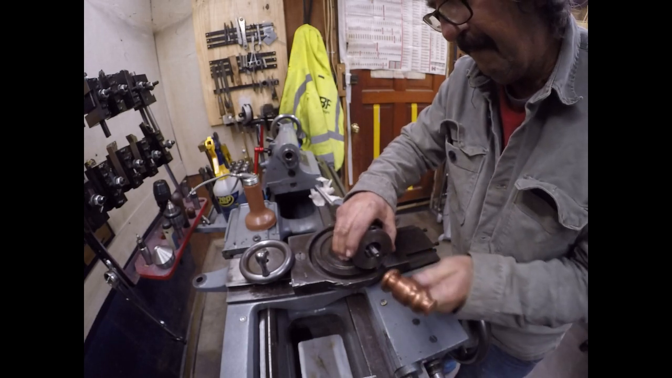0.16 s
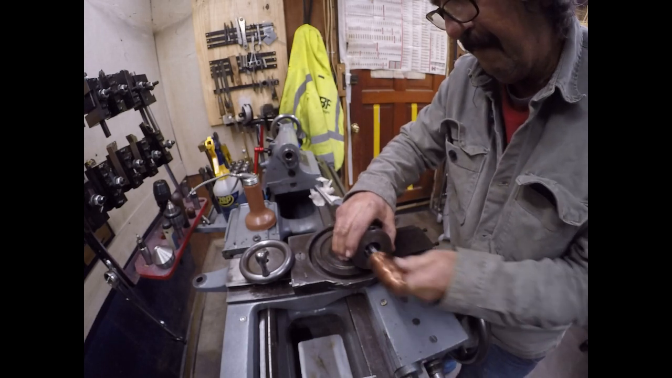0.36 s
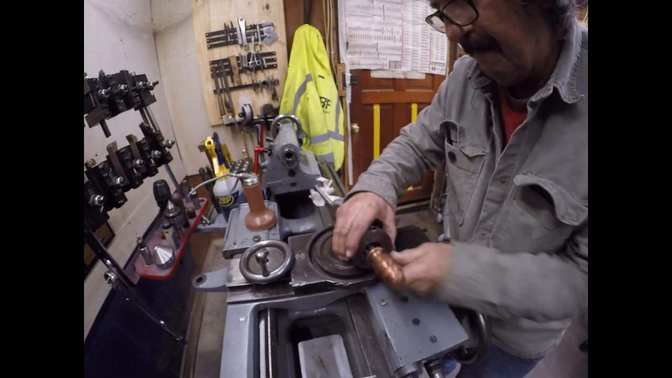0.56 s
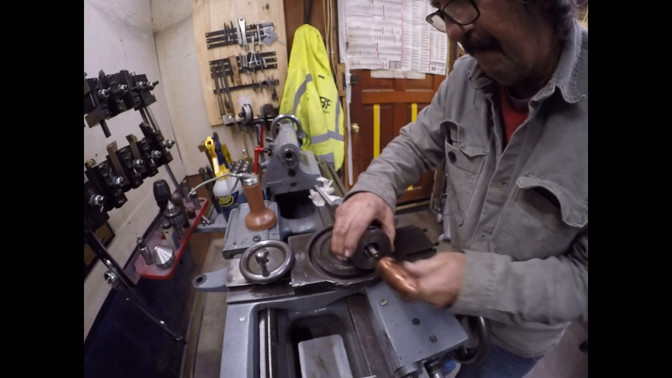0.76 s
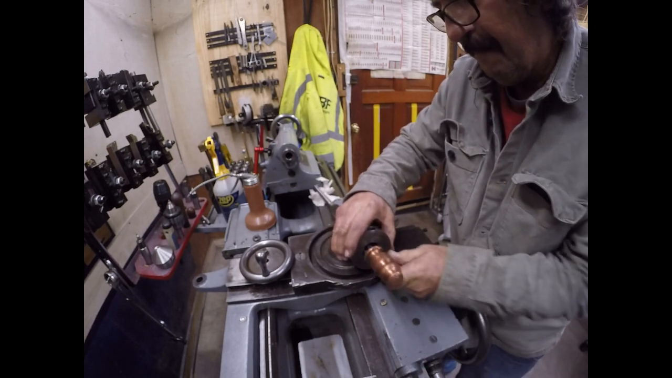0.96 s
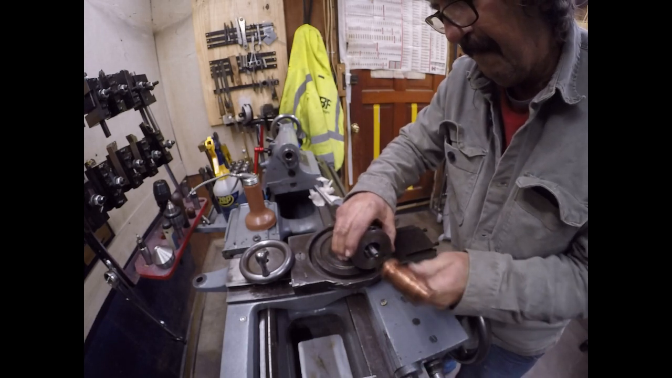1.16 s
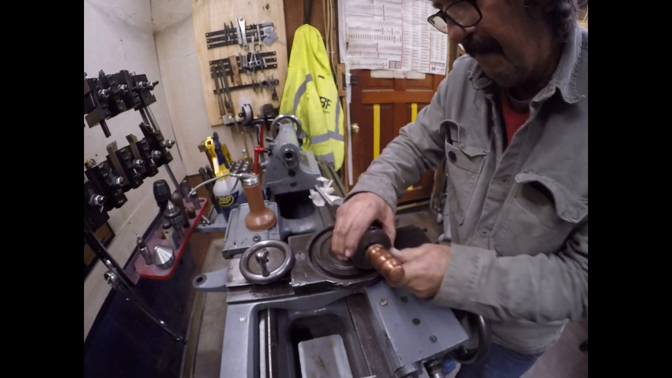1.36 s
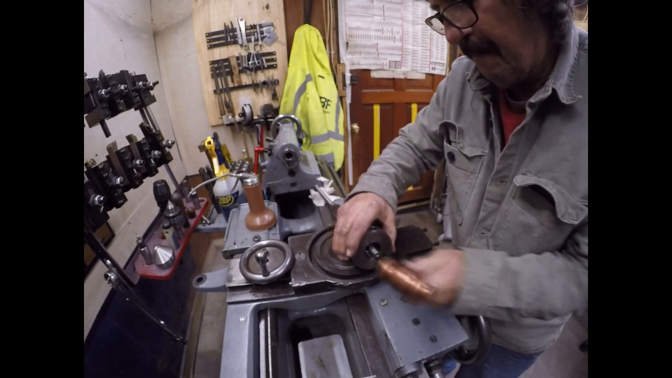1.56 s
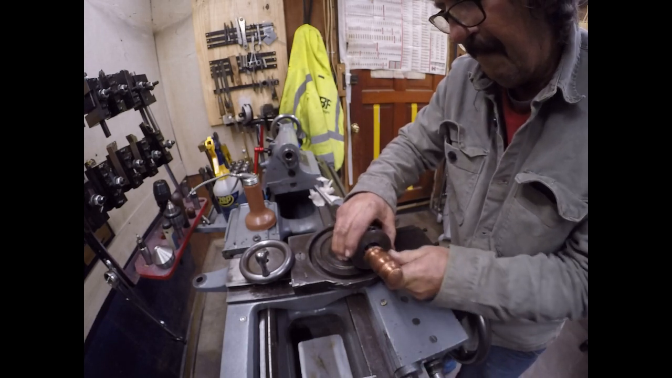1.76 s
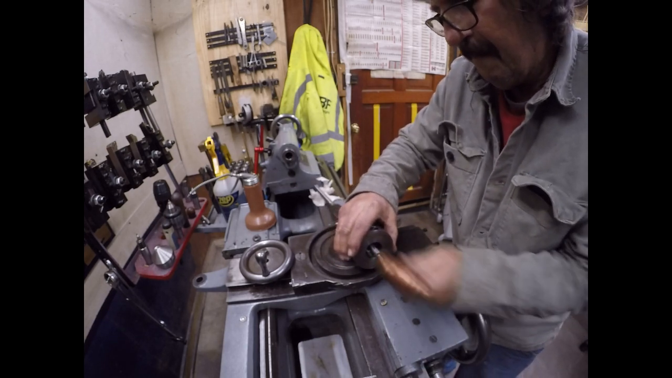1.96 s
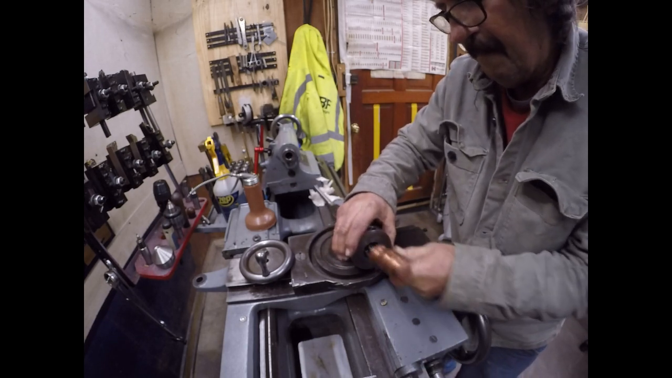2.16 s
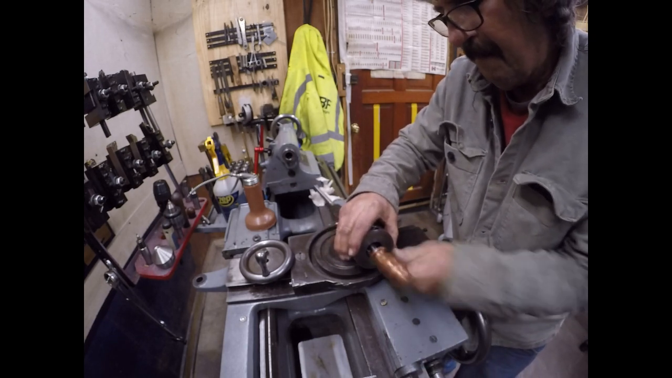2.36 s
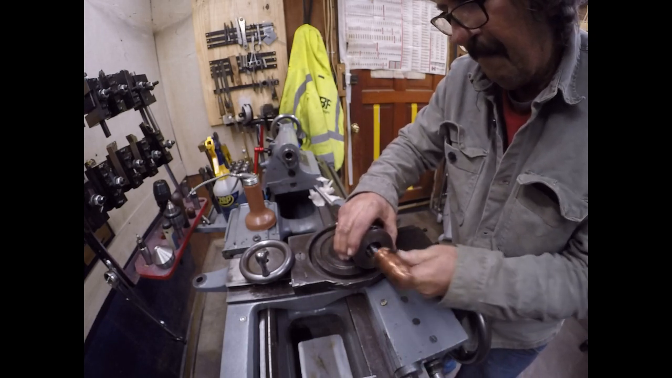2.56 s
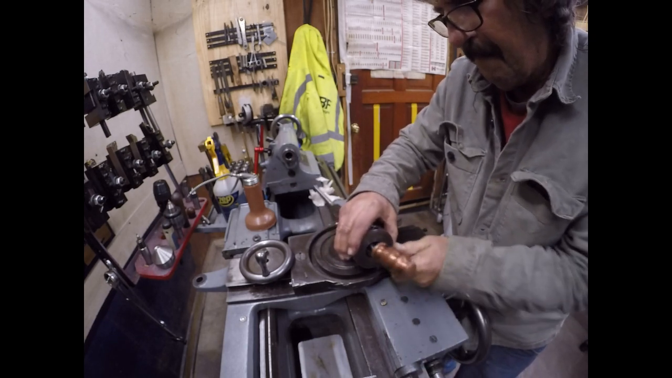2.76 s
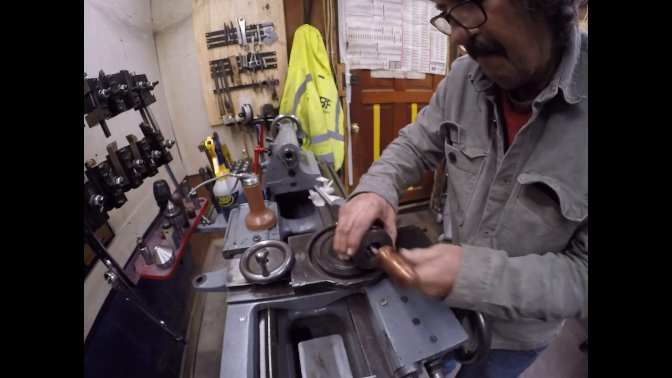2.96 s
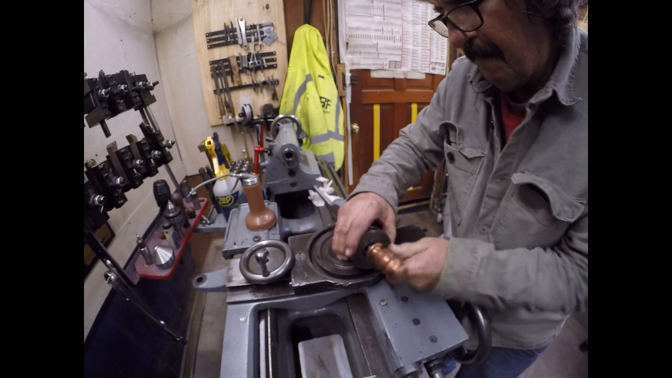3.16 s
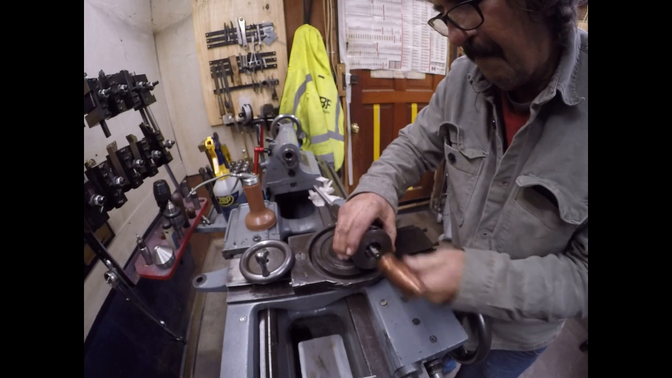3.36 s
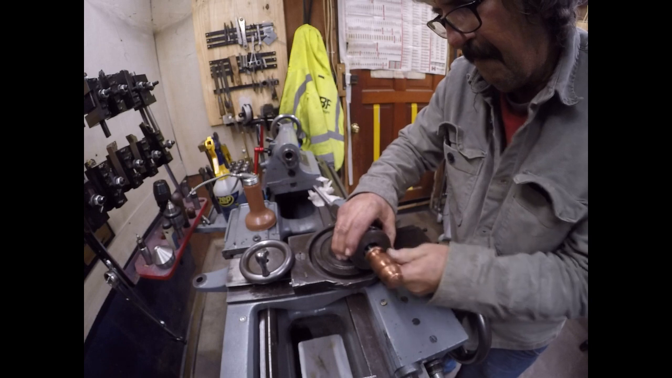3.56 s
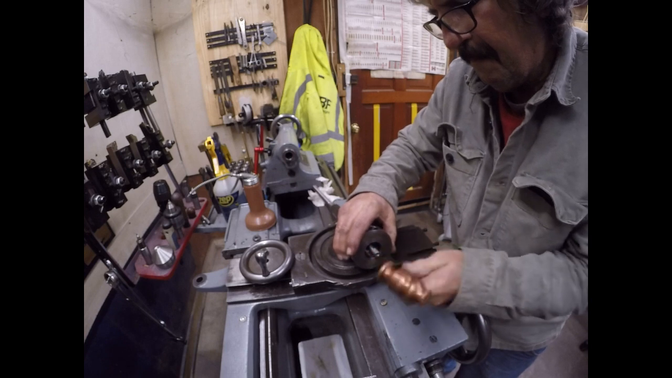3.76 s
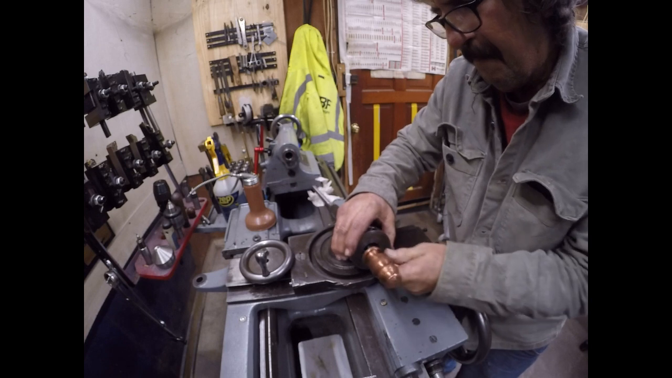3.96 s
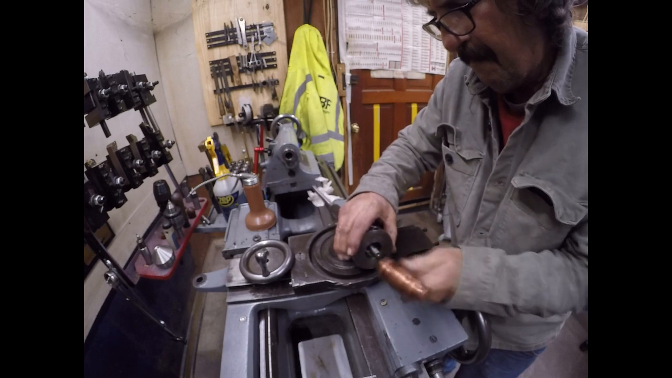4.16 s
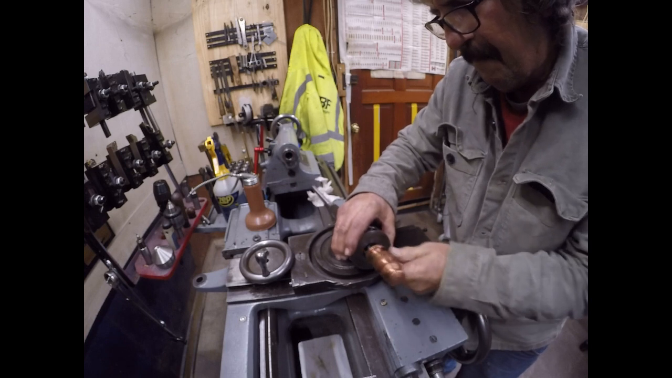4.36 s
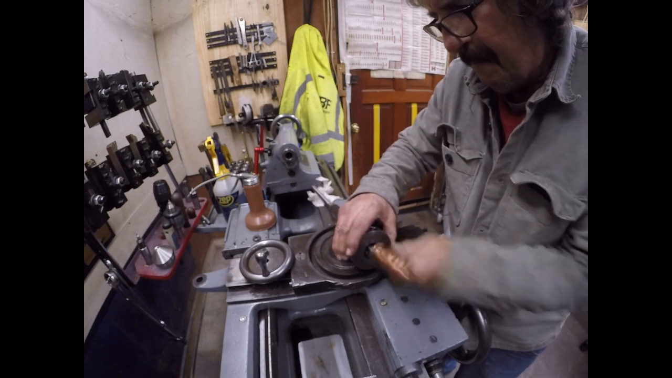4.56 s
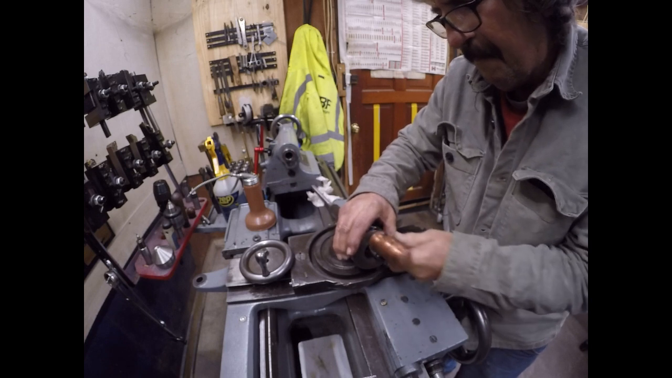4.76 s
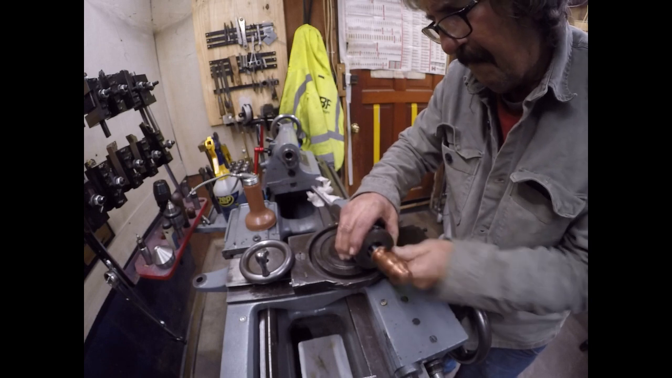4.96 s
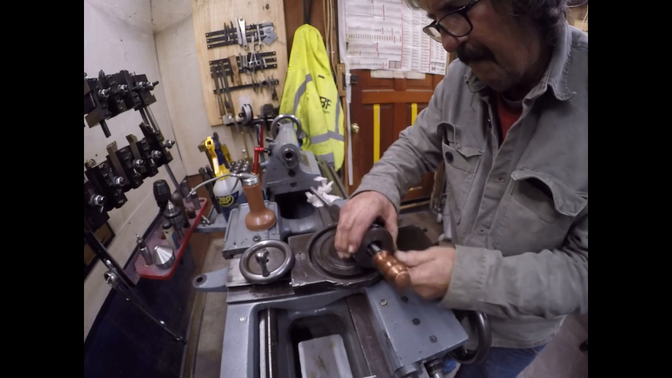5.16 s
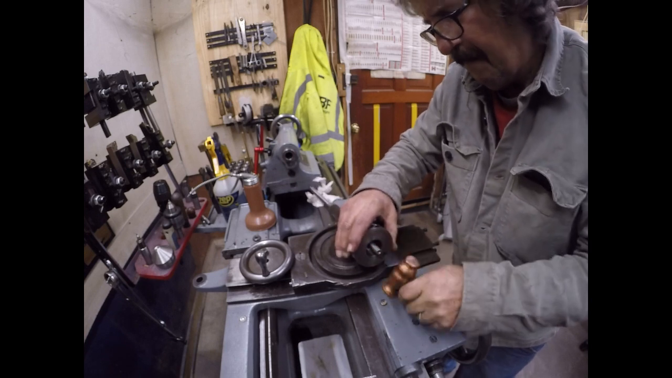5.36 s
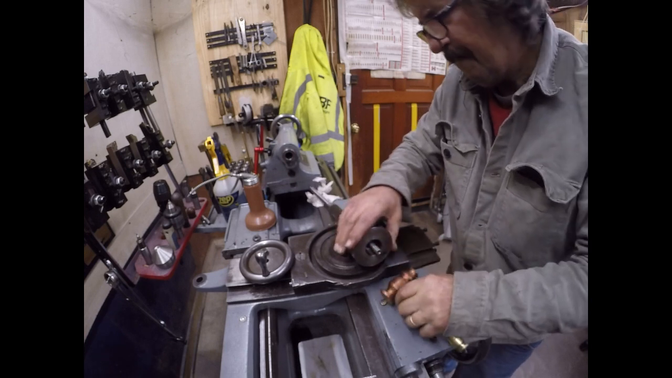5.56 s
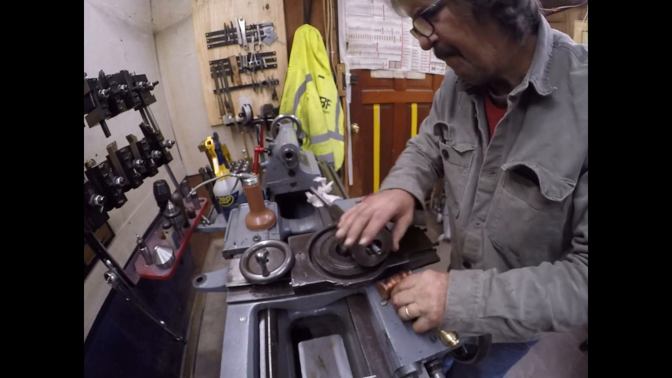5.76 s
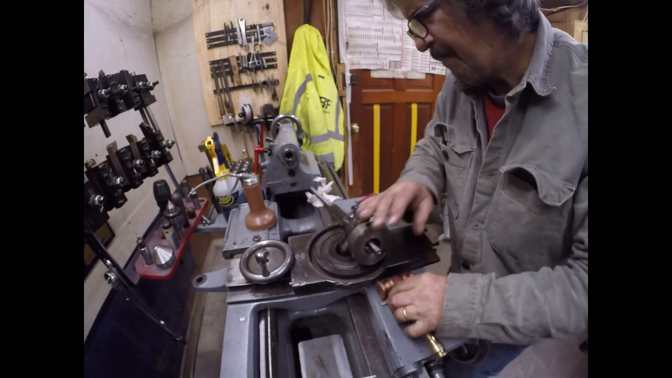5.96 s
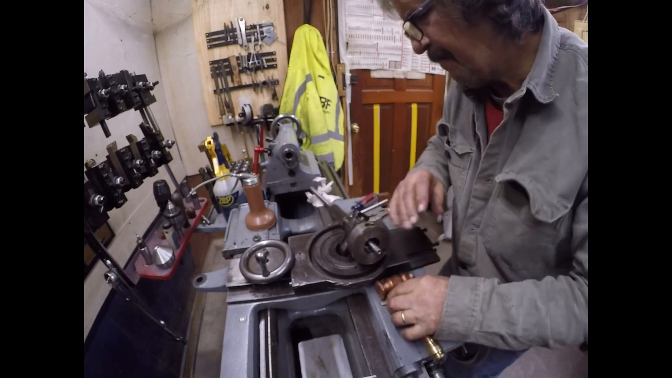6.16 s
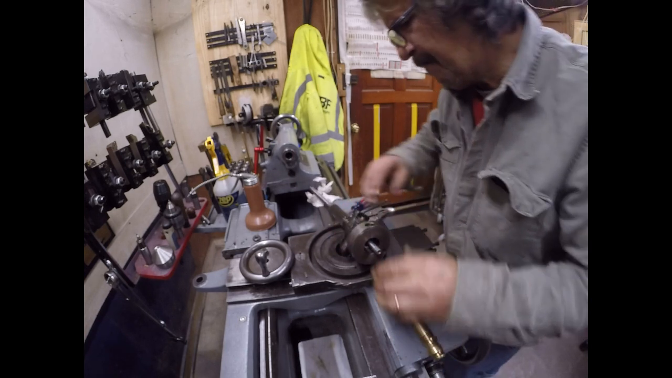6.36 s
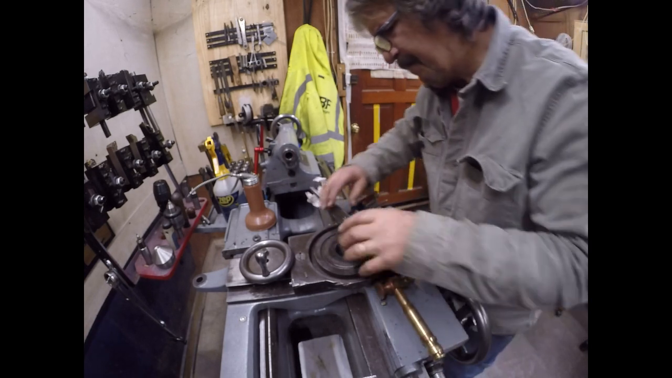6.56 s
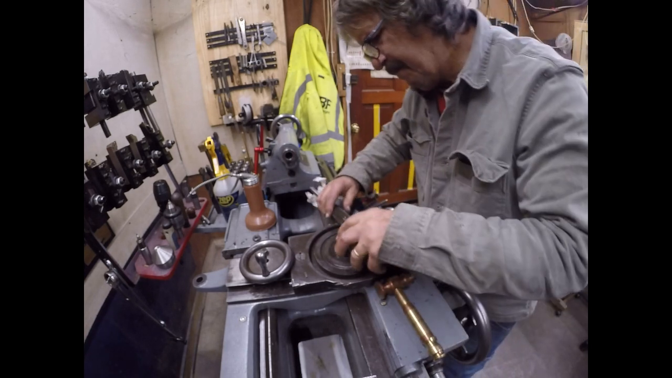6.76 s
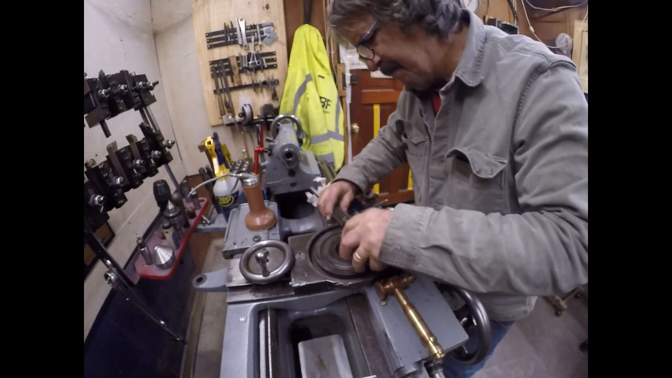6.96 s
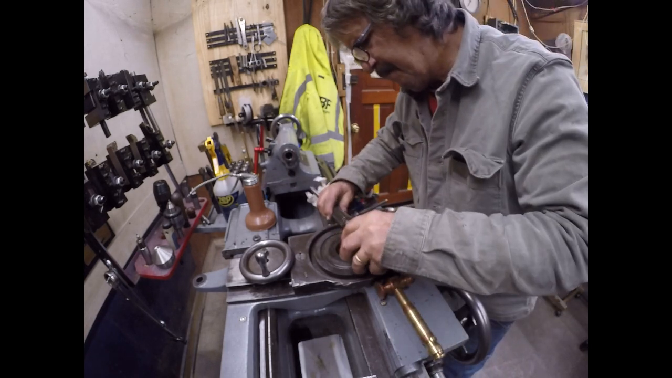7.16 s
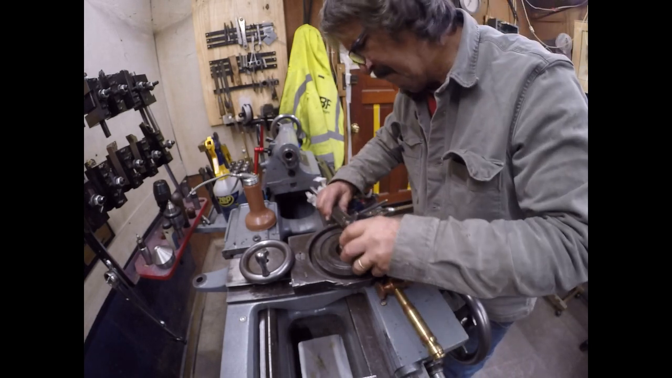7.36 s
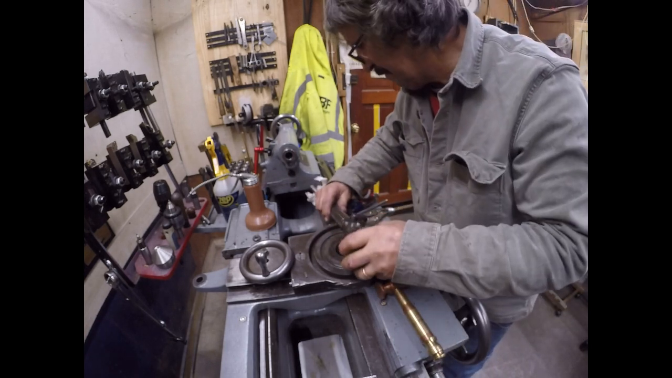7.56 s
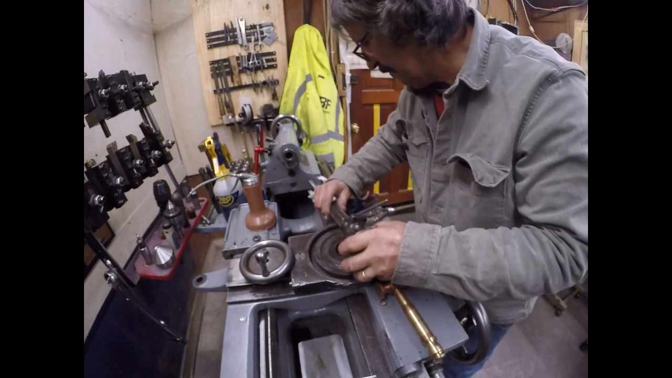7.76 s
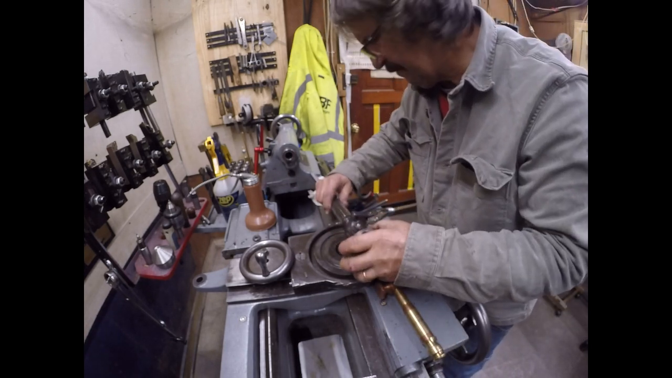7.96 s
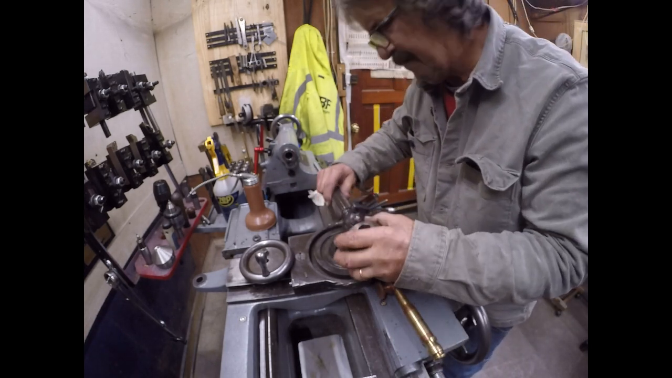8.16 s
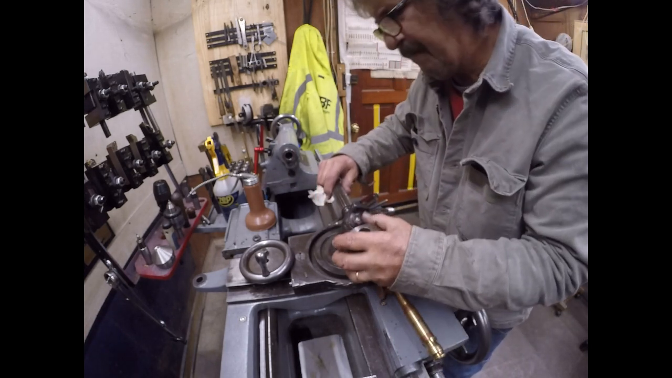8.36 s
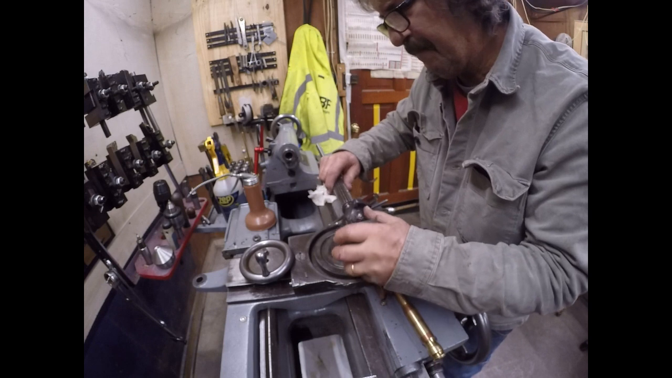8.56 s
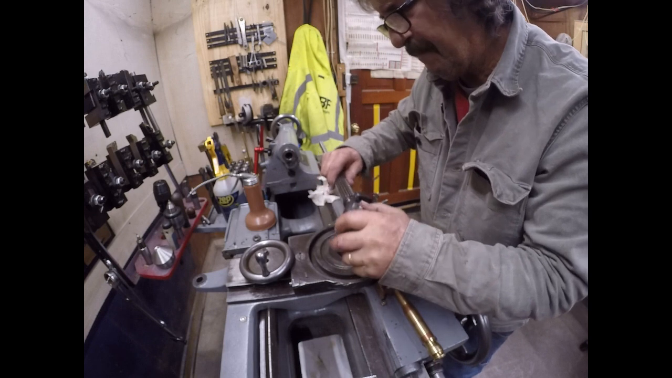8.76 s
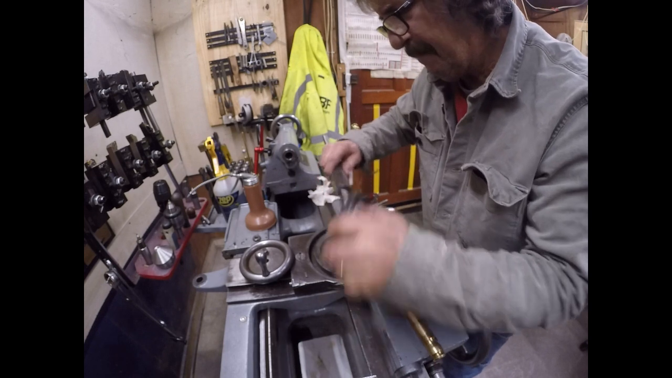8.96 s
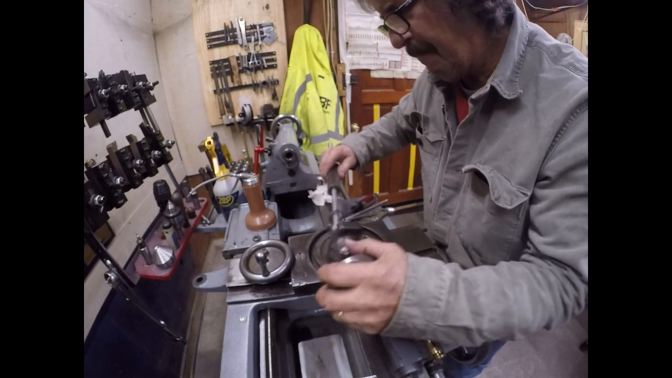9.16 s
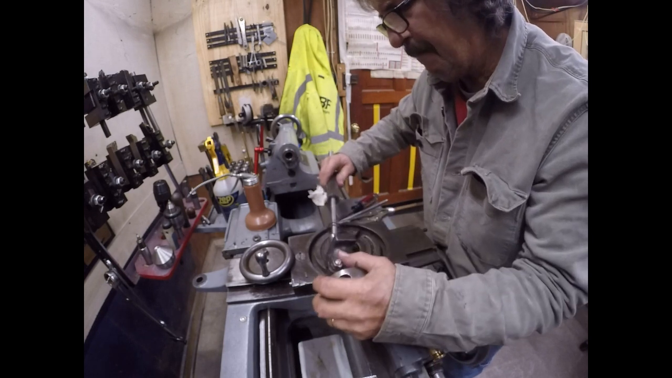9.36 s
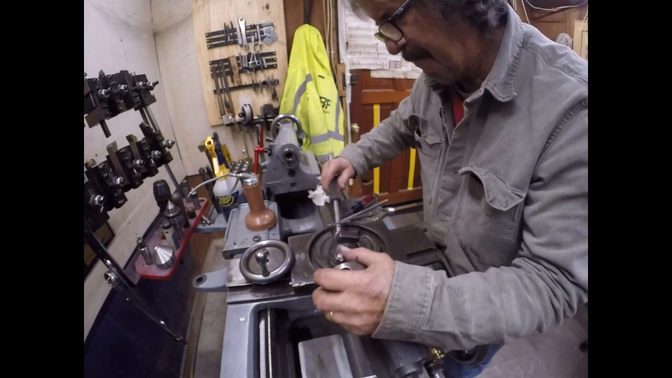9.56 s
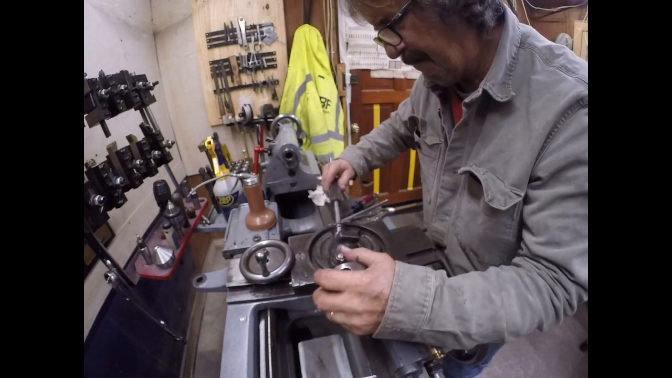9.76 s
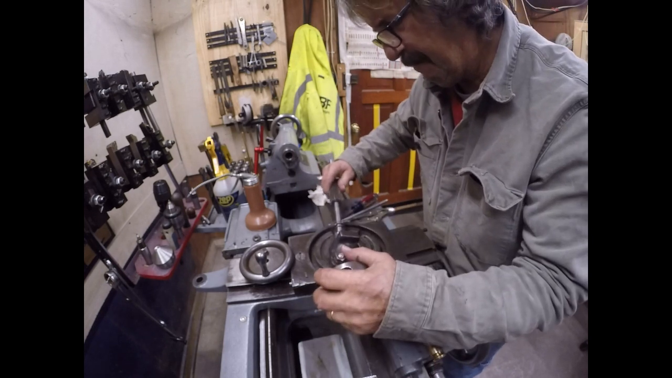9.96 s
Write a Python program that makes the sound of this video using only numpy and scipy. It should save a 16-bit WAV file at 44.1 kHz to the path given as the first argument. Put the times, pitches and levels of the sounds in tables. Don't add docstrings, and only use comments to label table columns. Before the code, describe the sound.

A close microphone in a small workshop. From 0.3 to 5.05 seconds a small hammer hits a heavy clamped steel part fourteen times, evenly, about 0.36 seconds apart: loud, sharp cracks with dense bright clank and short rings, slightly varying in tone, the tail of an earlier blow heard at the very start. Small rebounds clink at 4.75. From 5.6 to 6.5 tools are set down with quieter clinks, the clearest at 6.0, and short scrapes; a duller set-down falls at 7.1. From 7.65 to 8.25 a small part ticks faintly in the fingers. At 9.0 to 9.2 it rattles in a quick bright cluster, loudest near 9.2, with a last knock at 9.57. Beneath lie soft hiss, low rumble, a faint high electronic whine, and, from 5.75 to 9.2, a distant engine climbing through gears.

```python
import sys
import numpy as np
from scipy import signal
from scipy.io import wavfile
from scipy.ndimage import uniform_filter1d

SR = 44100
rng = np.random.default_rng(int(sys.argv[2]) if len(sys.argv) > 2 else 0)


def digitize_waveform(pressure):
    field = np.atleast_2d(pressure).T
    bounded = np.clip(field, -1, 1)
    quanta = np.round(bounded * 32767).astype(np.int16)
    wavfile.write(sys.argv[1], SR, quanta)


def ratio(d):
    e = np.asarray(d, float) / 20
    return 10 ** e


N = 440986
LEAD = 750

# (time [s], level [dB], squareness [dB], favoured pitch [Hz])
HAMMER_BLOWS = [(0.3209, -0.46, 0.6, 3460), (0.6392, -0.16, 2, 2980), (0.9777, -0.75, -1, 2220),
                (1.3308, 1.2, -2.2, 2065), (1.6915, 0.53, 0.2, 3240), (2.0754, -0.2, .9, 3240),
                (2.4499, -0.65, -0.8, 3240), (2.823, -0.85, 2, 2190), (3.1775, -0.66, 2, 2520),
                (3.5476, -0.5, 1.96, 4920), (3.913, 0, -0.1, 3200), (4.2927, -0.84, -0.3, 3150),
                (4.6523, 0, -1, 2620), (5.0462, 0, -0.7, 2290)]
# (time after -LEAD [s], level [dB], squareness [dB], favoured pitch [Hz])
PRIOR_BLOW = (0, -0.5, -2.5, 2999)
# (time [s], level [dB], weight [dB], hardness [dB], favoured pitch [Hz])
TOOL_CLINKS = [(4.2248, -62, 6, -17, 982), (4.243, -66, 8, -15, 920), (4.7516, -24.5, -3, -17, 1060),
               (4.7944, -33, -11.5, -13, 2800), (4.8358, -40, 0, -12, 3230), (5.6171, -33, 7.5, -15, 1000),
               (5.6835, -55.5, 17.5, -48, 1550), (5.7315, -24.5, 4, -43, 1600), (5.815, -48, 15, -33, 1560),
               (6.0053, -18, -8.5, -30, 2880), (6.0936, -32, 3.5, -30, 1450), (6.4931, -41, 8.5, -29, 1078),
               (7.0277, -47, 1.5, -31, 1385), (7.0788, -21, 1.5, -53, 2705),
               (7.6742, -52, 8.5, -16.5, 1070), (8.049, -58, 8, -27, 700), (9.4885, -43.5, 13, -29, 400)]
# (time [s], level [dB], weight [dB], hardness [dB], favoured pitch [Hz])
PART_KNOCKS = [(8.992, -32.5, -15, -32, 3020), (9.0143, -36.5, -7, -29, 1440), (9.0597, -21, -13, 1, 3170),
               (9.0786, -22, -38, -6, 4540), (9.0994, -23, -39, 5, 3960), (9.1164, -20, -44, -4, 5350),
               (9.128, -26, -26, -1, 3210), (9.1526, -17.5, -8, -7.5, 3050), (9.191, -14.5, -13, -15, 5070),
               (9.198, -9.5, -18.5, -7.5, 1310), (9.3384, -42.5, -23, -6, 3240),
               (9.3855, -38.5, -9, -4, 3330), (9.502, -39, -6, -8, 599), (9.555, -37.5, 13, -24, 630),
               (9.5677, -19.5, 0, -15, 2980)]
# (time [s], level [dB], favoured pitch [Hz])
FINGER_TICKS = [
    (7.6596, -50, 3780),
    (7.704, -40.5, 3240),
    (7.7194, -57, 3050),
    (7.7777, -49, 3230),
    (7.8497, -53, 3350),
    (7.9774, -47, 3250),
    (7.9984, -52, 2880),
    (8.026, -44, 2950),
    (8.0694, -51, 2860),
    (8.2529, -36, 2850),
]
# (start [s], length [s], peak position [share], peak level [dB], weight [dB])
SLIDE_STROKES = [(3.801, .095, .8, -74, 9), (4.181, 0.086, .7, -65, 8), (4.956, 0.079, 0.81, -45, 0),
                 (5.88, 0.15, 0.48, -48, -3), (6.022, 0.076, 0.26, -34, -3), (6.41, 0.12, .25, -33, -5),
                 (6.756, .055, .4, -56.5, -30.5), (7.591, 0.14, 0.52, -57.5, 5),
                 (7.956, 0.13, 0.49, -54.5, -3.5), (9.06, .13, .3, -25.5, -20.5),
                 (9.498, 0.049, 0.071, -44, 8)]
# (time [s], level [dB])
BENCH_THUMPS = [
    (6.03, -44),
    (7.081, -40),
    (7.68, -51.5),
    (8.04, -48),
    (9.49, -40),
    (9.555, -46),
]
# (frequency [Hz], level [dB per Hz])
VICE_BODY = [(35, -38), (60, -6), (194, -11), (532, -14.5), (673, 0.5), (1130, -4), (1460, -5), (2230, -4),
             (3170, 1), (3730, -2), (7550, -8), (14200, -20.5), (16400, -52)]
# (frequency [Hz], T60 [s])
VICE_DECAY = [(100, 0.098), (400, 0.32), (1500, .07), (4000, 0.037), (8000, 0.073), (14000, 0.018)]
# (frequency [Hz], level [dB], T60 [s])
VICE_RINGS = [(59, -10, 0.46), (94.53, -6, 0.48), (205.6, -12.5, 0.27), (248, -10.5, 0.33),
              (363.6, -5.5, 0.37), (464.6, -5.5, 0.49), (662, -9.5, 0.16), (777.7, -7, 0.36),
              (1240, -11, 0.076), (1462, -10, 0.67), (2360, -7, .13), (2540, -14, .13), (3240, -11.5, 0.51),
              (3460, -11, .12), (4920, -12, 0.26), (7400, -15.5, 0.26), (10070, -23, 0.15),
              (11600, -20, 0.15), (14700, -22.5, .12)]
# (frequency [Hz], level [dB], T60 [s])
PART_RINGS = [(1231, 2.5, 0.11), (2850, -4.5, 0.11), (3210, -1, 0.16), (3860, -2, 0.17), (4460, -11.5, .1),
              (4900, -4.5, 0.14), (5700, -1.5, 0.097), (5920, 3, 0.11), (6560, -15, .15),
              (9200, -3.5, 0.087), (11280, -6, 0.054)]
# (frequency [Hz], T60 [s])
ROOM_DECAY = [(100, 0.39), (300, .35), (1000, 0.28), (3000, 0.28), (7000, 0.25), (11000, .2), (15500, 0.11)]
# (start [s], end [s], first pitch [Hz], last pitch [Hz], level [dB])
GEAR_PULLS = [
    (5.753, 6.551, 85, 109.5, -46.5),
    (6.948, 7.2, 111, 96.3, -49.5),
    (7.148, 8.551, 91, 112.5, -46),
    (8.578, 9.198, 113, 119.9, -55.5),
]
# (time [s], level [dB])
IDLE_LEVEL = [(0.0, -61), (3.06, -61.5), (3.84, -51), (5.4, -62), (5.7, -59.5)]
# (time [s], pitch [Hz], level [dB])
SECOND_ENGINE = [(0, 57.97, -58), (5., 59, -53.5), (5.5, 59, -73.5), (7.8, 60, -74.5), (8.2, 62.4, -62),
                 (9.2, 71.1, -68), (10., 77.6, -73)]
# (frequency [Hz], level [dB per Hz])
AIR_SPECTRUM = [(11, -41), (18, -23.5), (49, -9.5), (65, -17), (79, -12), (102, -17.5), (175, -35),
                (268, -32), (308, -34.5), (1050, -43), (2190, -43), (4090, -46), (10700, -57),
                (14700, -55.5), (16000, -67)]
# (time [s], level [dB])
TRAFFIC_RUMBLE = [(0.0, -47.5), (1.6, -48.5), (5.2, -54), (5.8, -54), (10.0, -52.5)]

# usual level [dB], gain [dB per dB of squareness]
BLOW_TILT_DB, TILT_PER_SQUARE = (-26.5, -11, -9.5), (2.2, 0.23, 0.99)
TICK_TILT_DB = (-25, -17, -20)
# (offset [dB], slope [dB per dB])
CLINK_THUD, CLATTER_THUD = (-13, 1.3), (-10.5, .7)
SLIDE_THUD, SLIDE_SPARKLE = (1.6, 1.8), (-14.5, -.6)
SLIDE_START_DB, SLIDE_END_DB, END_WEIGHT_DB = -40, -22, 5
BLOW_CRACK_DB, CLINK_CRACK_DB, CLATTER_CRACK_DB = -9, -12, -15
CRACK_S, CRACK_HZ, SOFT_CRACK_HZ = .0022, (1210, 7000), (900, 5200)
CONTACT_ADVANCE_S = .0008
BENCH_HZ, BENCH_T60_S, BENCH_RISE_S = np.array([252, 268]), np.array([.25, .2]), 0.0089
GEAR_EDGE_S, GEAR_WAVER_DB = 0.074, 1
AIR_DB, RUMBLE_SWELL_DB = -50.5, 3.5
WHINE_HZ, WHINE_DB, WHINE_START_S, FRAME_RATE_HZ = 10400, -80.5, .004, 29.97
EDGE_HZ = 15600


def read(points, hz):
    f, value = np.transpose(points)
    return np.interp(np.log(hz + 1), np.log(f + 1), value)


def evened(x):
    return x / np.sqrt(np.mean(x ** 2) + 1e-20)


def add(mix, s, sound):
    part = mix[max(round(s * SR) + LEAD, 0):][:len(sound)]
    part += sound[:len(part)]


def bandpass(x, order, edges_hz):
    return signal.sosfilt(signal.butter(order, edges_hz, "band", fs=SR, output="sos"), x)


def bank(hz, t60, length_s=.3):
    t = np.arange(round(length_s * SR)) / SR
    return ratio(-60 * t / t60[:, None]) * np.sin(2 * np.pi * hz[:, None] * t)


def colour_db(hz, thud, knock, sparkle):
    points = [(140, thud - 7), (300, thud), (700, knock), (1600, knock),
              (2400, 0.0027), (4800, 0.00064), (7000, sparkle)]
    return read(points, hz)


def strike(rows, rings, rings_db, longest_s, held_s, rise_s, favour_db, usual, trim_db, count=900):
    place = (np.arange(count) + rng.random(count)) / count
    hz = 50 + 15300 * place ** 1.6
    body_t60 = read(VICE_DECAY, hz)
    body = ratio(read(VICE_BODY, hz)) * np.sqrt(place ** .6 / body_t60)
    ring_hz, ring_db, ring_t60 = np.transpose(rings)
    weights = np.append(evened(body), np.sqrt(count / len(rings)) * ratio(ring_db + rings_db))
    hz = np.append(hz, ring_hz)
    t60 = np.append(body_t60, np.minimum(ring_t60, longest_s))
    modes = bank(hz, 1 / (1 / t60 + 1 / held_s), 0.14)
    t = np.arange(modes.shape[1]) / SR
    shape = (1 - np.exp(-t / rise_s)) * np.minimum(1, (t[-1] - t) / 0.032)
    luck = np.tanh(3.2 * rng.standard_normal((len(rows), len(hz))))
    out = np.zeros((2, N + LEAD))
    for (s, db, thud, knock, sparkle, favoured_hz), chance in zip(rows, luck):
        favoured = ratio(favour_db * np.exp(-(np.log(hz / favoured_hz) / 0.15) ** 2))
        tilt = np.subtract((thud, knock, sparkle), usual)
        coloured = weights * favoured * ratio(colour_db(hz, *tilt))
        near_2900 = abs(np.log(hz / 2900)) < .55
        upper = (weights * favoured * chance * near_2900) @ modes[:, :300]
        direct = ratio(db + trim_db) * shape * (coloured * chance @ modes) / np.sqrt(np.mean(upper ** 2))
        around = (coloured * (1 + .8 * chance) @ modes) * (shape > 0)
        around = bandpass(around, 2, (110, 15000))
        add(out[0], s - CONTACT_ADVANCE_S, direct)
        add(out[1], s - CONTACT_ADVANCE_S, around * np.linalg.norm(direct) / np.linalg.norm(around))
    return out


def cracks(rows, trim_db, edges_hz, order):
    t, out = np.arange(600) / SR, np.zeros(N + LEAD)
    noise = bandpass(rng.standard_normal((len(rows), len(t))), order, edges_hz)
    for (s, db, *_), snap in zip(rows, noise):
        add(out, s - CONTACT_ADVANCE_S, ratio(db + trim_db) * np.exp(-t / CRACK_S) * evened(snap))
    return out


def weighted(rows, thud):
    return [(s, db, thud[0] + thud[1] * weight, weight, hard, hz) for s, db, weight, hard, hz in rows]


def hammer():
    first = (PRIOR_BLOW[0] - LEAD / SR, *PRIOR_BLOW[1:])
    blows = []
    for s, db, square, hz in [first] + list(HAMMER_BLOWS):
        blows.append((s, db, *(BLOW_TILT_DB + square * np.array(TILT_PER_SQUARE)), hz))
    ringing = strike(blows, VICE_RINGS, rings_db=-9, longest_s=0.57, held_s=1.6, rise_s=0.00016,
                     favour_db=4.1, usual=(-24, -12, -10), trim_db=-8.0)
    return ringing + cracks(blows, BLOW_CRACK_DB, CRACK_HZ, order=1)


def clinks():
    ringing = strike(weighted(TOOL_CLINKS, CLINK_THUD), VICE_RINGS, rings_db=-4, longest_s=0.35,
                     held_s=0.66, rise_s=0.0016, favour_db=3.9, usual=(-16, -9, -6), trim_db=-4)
    return ringing + cracks(TOOL_CLINKS, CLINK_CRACK_DB, SOFT_CRACK_HZ, order=2)


def clatter():
    contacts = [(s, db, *TICK_TILT_DB, hz) for s, db, hz in FINGER_TICKS]
    contacts += weighted(PART_KNOCKS, CLATTER_THUD)
    ringing = strike(contacts, PART_RINGS, rings_db=-2.0, longest_s=0.088, held_s=0.39, rise_s=.0015,
                     favour_db=12.4, usual=(-16, -9, -6), trim_db=-9)
    return ringing + cracks(contacts, CLATTER_CRACK_DB, CRACK_HZ, order=1)


def bench():
    out, ring = np.zeros(N + LEAD), bank(BENCH_HZ, BENCH_T60_S).sum(axis=0)
    rise = 1 - np.exp(-np.arange(len(ring)) / SR / BENCH_RISE_S)
    for s, db in BENCH_THUMPS:
        add(out, s, ratio(db) * ring * rise)
    return out


def stroke(start, length, share, db, weight):
    share = np.clip(share, .05, .95)
    at = start + length * np.array([0, share, 1])
    level = db + np.array([SLIDE_START_DB * share, 0, SLIDE_END_DB * (1 - share)])
    weight = weight + END_WEIGHT_DB * np.array([1, 0, 1])
    thud = SLIDE_THUD[0] + SLIDE_THUD[1] * weight
    sparkle = SLIDE_SPARKLE[0] + SLIDE_SPARKLE[1] * weight
    return np.transpose([at, level, thud, weight, sparkle])


def slide(rows, slips_per_s=5000, spread_db=3.5):
    s, db, thud, knock, sparkle = np.transpose(rows)
    t = np.arange(s[0], s[-1], 1 / SR)
    out = np.zeros(len(t) + 1300)
    ranges = [((217.0, 600), thud), ((585, 1200), knock), ((4860, 17000), sparkle), ((1743, 4100), 0 * db)]
    for edges_hz, rel_db in ranges:
        grain = bandpass(np.eye(1, 1301)[0], 2, edges_hz)
        size = ratio(spread_db * np.minimum(rng.exponential(1, len(t)), 3))
        slips = size * (rng.random(len(t)) < slips_per_s / SR) * rng.choice([-1, 1], len(t))
        gain = ratio(np.interp(t, s, db + rel_db)) * signal.windows.tukey(len(t), .1)
        out += signal.fftconvolve(evened(slips) * gain / np.linalg.norm(grain), grain)
    return s[0], ratio(-5.0) * out


def slides():
    out = np.zeros(N + LEAD)
    for row in SLIDE_STROKES:
        add(out, *slide(stroke(*row)))
    return out


def room(x):
    t, out = np.arange(len(x)) / SR, np.zeros(len(x))
    for k in range(3):
        taps = np.zeros(SR // 2)
        at = np.arange(180, SR // 2 - 20, 12)
        taps[at + rng.integers(0, 12, len(at))] = rng.choice([-1., 1.], len(at))
        hz, s, z = signal.stft(taps, SR, nperseg=256)
        tail = signal.istft(z * ratio(-60 * s / read(ROOM_DECAY, hz)[:, None]), SR, nperseg=256)[1]
        share = np.sqrt(2 / 3) * np.cos(2 * np.pi * (.9 * t + k / 3))
        out += signal.oaconvolve(x * share, tail / np.linalg.norm(tail))[:len(x)]
    return out


def whistle(hz, width):
    r = np.exp(-np.pi * width / SR)
    slow = rng.standard_normal(N) + 1j * rng.standard_normal(N)
    for _ in range(2):
        slow = signal.lfilter([1 - r], [1, -r], slow)
    carrier = np.exp(2j * np.pi * np.cumsum(hz * np.ones(N)) / SR)
    return evened((slow * carrier).real)


def engine():
    t = np.arange(N) / SR
    waver = uniform_filter1d(uniform_filter1d(rng.standard_normal(N), size=6000), size=4000)
    waver_db = GEAR_WAVER_DB * evened(waver)
    moving = np.zeros(N)
    for start, end, first_hz, last_hz, db in GEAR_PULLS:
        hz = np.interp(t, [start, end], [first_hz, last_hz])
        firing = np.sqrt(2) * np.sin(2 * np.pi * np.cumsum(hz) / SR) + .5 * whistle(hz, 16.0)
        gate = np.clip(np.minimum(t - start, end - t) / GEAR_EDGE_S, 0, 1)
        moving += ratio(db - 4.5 + waver_db) * gate * firing
    idle = ratio(np.interp(t, *np.transpose(IDLE_LEVEL), right=-90)) * whistle(hz=95.0, width=11.0)
    s, hz, db = np.transpose(SECOND_ENGINE)
    second = ratio(np.interp(t, s, db)) * whistle(np.interp(t, s, hz), 5.2)
    hums = ratio(-55.0) * whistle(hz=42.6, width=5.9) + ratio(-58.5) * whistle(hz=23.7, width=14.)
    return moving + idle + second + hums


def air():
    frames, hz = N // 512 + 5, np.fft.rfftfreq(2048, 1 / SR)
    a, b, patches = rng.standard_normal((frames, 1025, 3)).T
    patches_db = evened(uniform_filter1d(uniform_filter1d(patches, 20, 0), 8, 1))
    s, db = np.transpose(TRAFFIC_RUMBLE)
    gusts_db = RUMBLE_SWELL_DB * evened(uniform_filter1d(rng.standard_normal(frames), size=24))
    rumble_db = np.interp(np.arange(frames) * 512 / SR, s, db) + 49.5 + gusts_db
    swell_db = rumble_db / (1 + (hz[:, None] / 90) ** 4)
    z = (a + 1j * b) * ratio(read(AIR_SPECTRUM, hz)[:, None] + patches_db)
    steady = signal.istft(z, nperseg=2048, noverlap=1536)[1]
    swelling = signal.istft(z * ratio(swell_db), nperseg=2048, noverlap=1536)[1][:N]
    return ratio(AIR_DB) * swelling / np.sqrt(np.mean(steady ** 2))


def whine():
    t = np.arange(N) / SR
    phase = (t - WHINE_START_S) * FRAME_RATE_HZ % 1
    gate = .6 * np.exp(-((phase - .12) / .05) ** 2) + np.exp(-((phase - .3) / .06) ** 2)
    tone = np.sqrt(2) * np.sin(2 * np.pi * WHINE_HZ * t) + .5 * whistle(WHINE_HZ, 200.)
    return ratio(WHINE_DB) * evened(gate) * tone


def scene():
    direct, to_room = hammer() + clinks() + clatter() + bench() + slides()
    near = (direct + ratio(-7) * room(to_room))[LEAD:]
    return (near + engine() + air() + whine())[None]


def top_cut(x):
    return signal.sosfilt(signal.butter(12, 16530, fs=SR, output="sos"), x)


def record(dry):
    ceiling = .95
    limited = signal.sosfilt(signal.cheby2(12, 40, EDGE_HZ + 100, fs=SR, output="sos"), dry)
    clipped = limited / (1 + abs(limited / ceiling) ** 6) ** (1 / 6)
    mix = signal.sosfilt(signal.cheby2(12, 40, EDGE_HZ + 1300, fs=SR, output="sos"), clipped)
    return top_cut(mix)


dry = scene()
out = record(dry)
digitize_waveform(out)
```